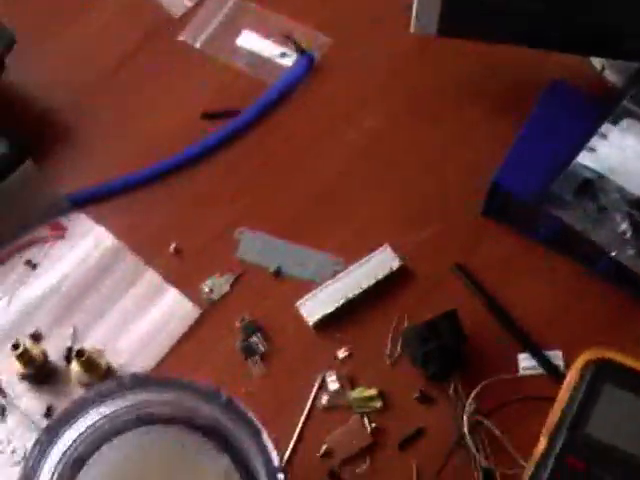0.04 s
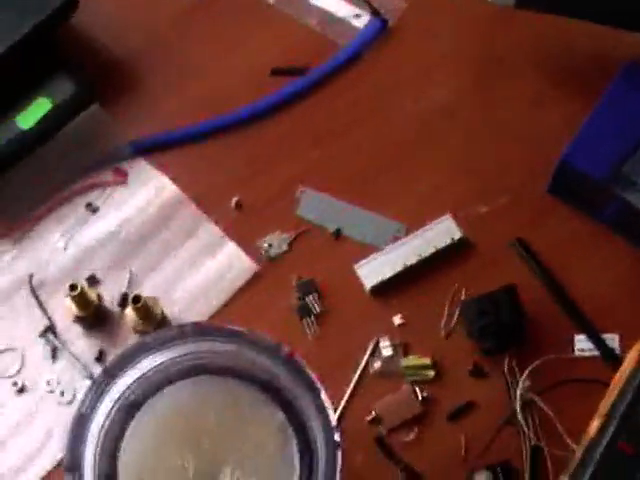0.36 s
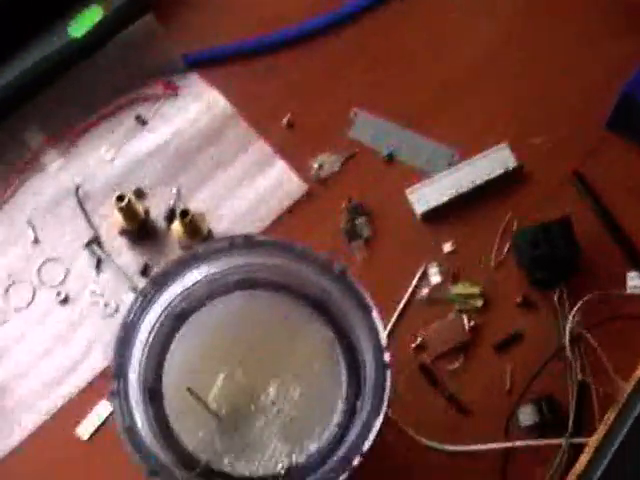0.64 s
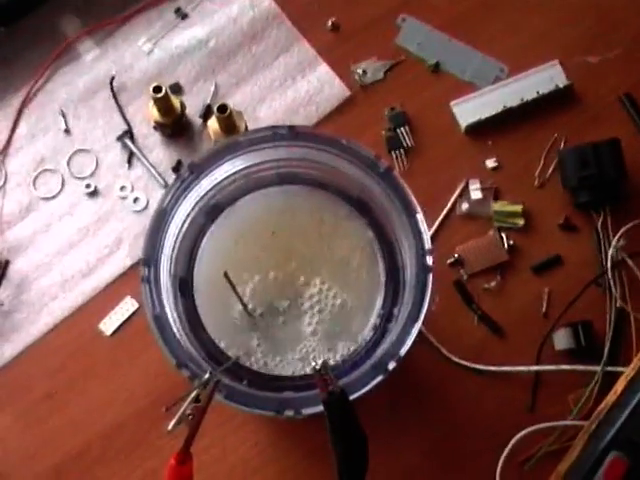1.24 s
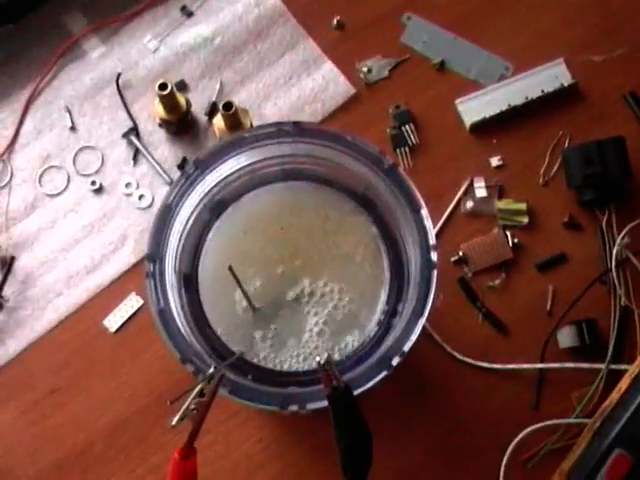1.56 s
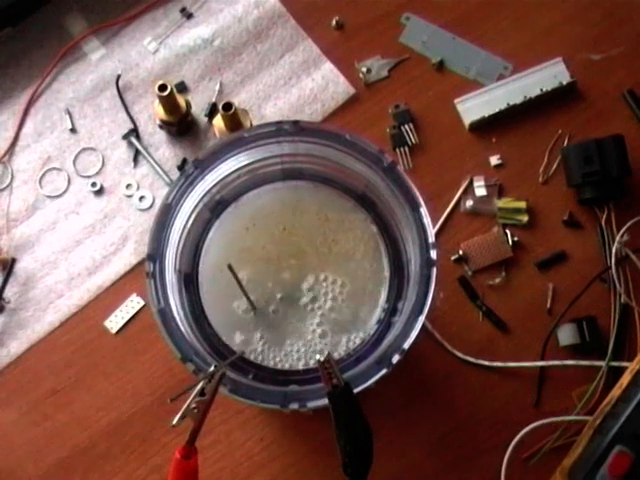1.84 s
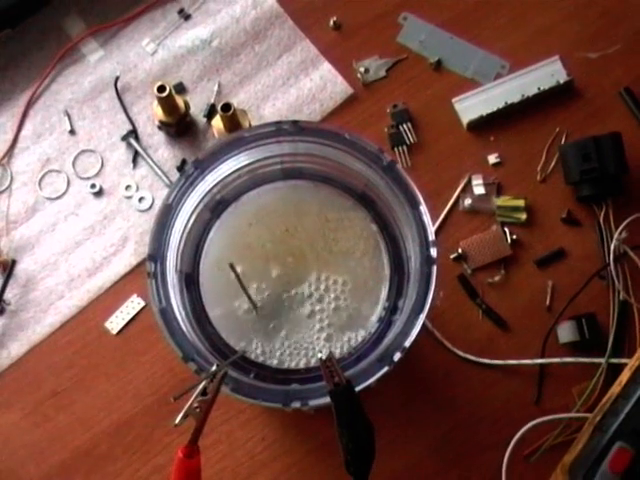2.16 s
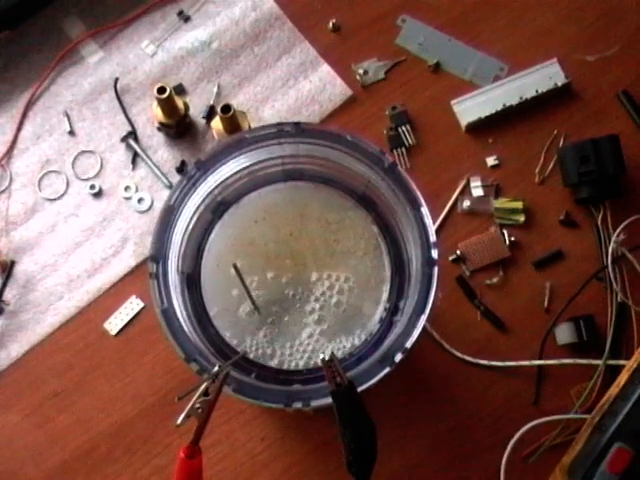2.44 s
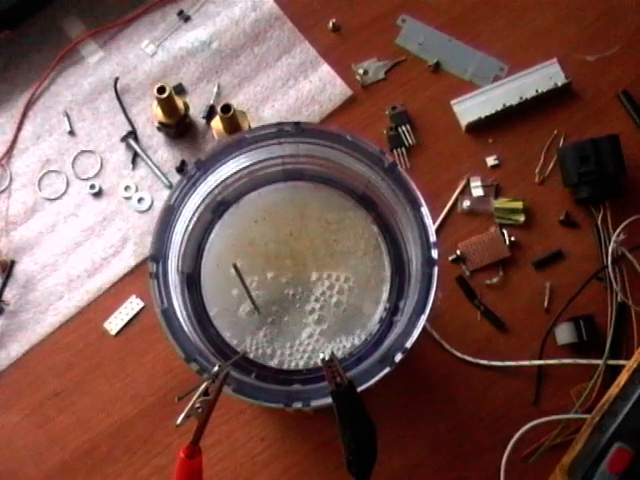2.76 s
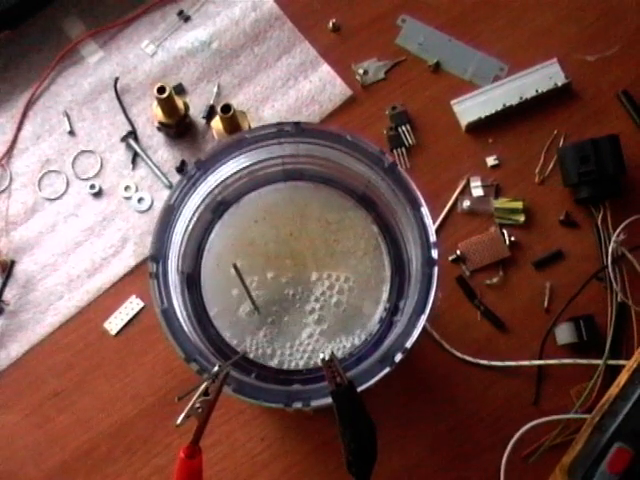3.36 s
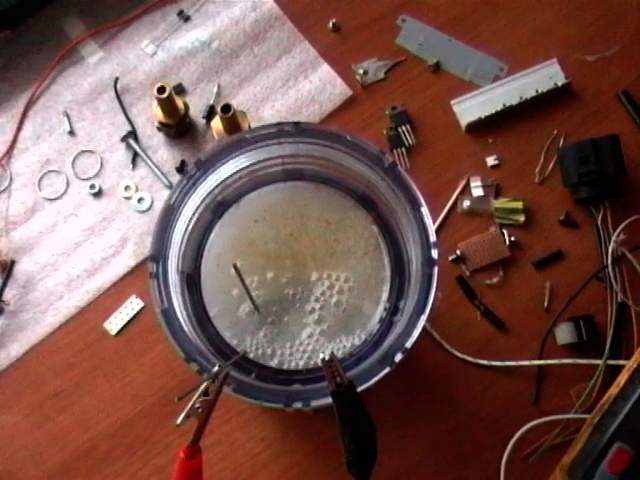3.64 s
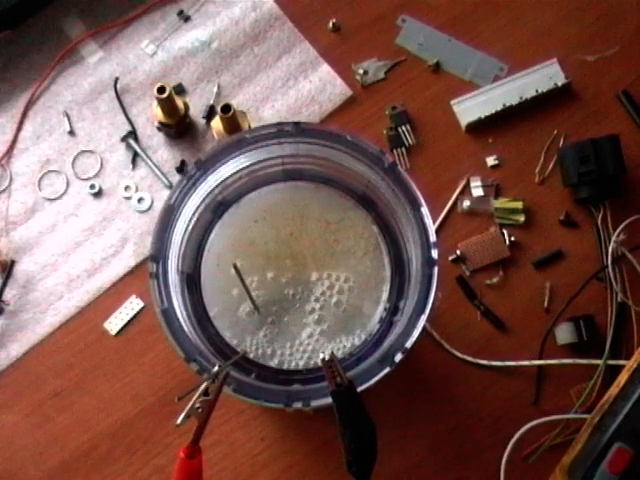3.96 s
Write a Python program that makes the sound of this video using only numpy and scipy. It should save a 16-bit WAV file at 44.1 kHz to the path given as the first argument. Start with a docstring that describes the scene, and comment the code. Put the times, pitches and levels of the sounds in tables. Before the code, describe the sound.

Steady fizzing of tiny bubbles over a faint motor whine, with one dull knock.

```python
"""On a workbench, an electrolysis cell fizzes over a small motor's whine and mains hum.
Thousands of tiny gas bubbles burst, each a damped oscillator, and excite the cell's resonances.
A far clatter reverberates and dies away; close by, two light taps and a dull knock
excite the modes of a damped body. A comb of narrow notches makes everything slightly hollow,
faint whistles sound throughout, and at last all is cut dead with a soft thump."""
import sys
import numpy as np
from scipy import signal
from scipy.fft import rfft, irfft
from scipy.io import wavfile

SR = 44100
rng = np.random.default_rng(int(sys.argv[2]) if len(sys.argv) > 2 else 0)


def put_to_file(sound):
    """Save the sound as 16-bit audio at rate SR, in the file named by the first command-line argument."""
    columns = np.atleast_2d(sound).T  # one column per channel
    safe = np.clip(columns, -1, 1)
    whole_steps = np.round(safe * 32767)
    wavfile.write(sys.argv[1], SR, whole_steps.astype(np.int16))


N = 176400
TIME = np.arange(N) / SR
FREQS = np.maximum(np.arange(N // 2 + 1) * SR / N, 1)
SIDES = np.array([[1], [-1]])  # left, right
ROTOR_HZ, MAINS_HZ, DRONE_HZ = 28.98, 49.83, 226.2
CLATTER_S, STOP_S = .334, 2.525

# Vigour of the fizzing: t/s, gain/dB
FIZZ_VIGOUR = [(0, -0.05), (.25, 0.59), (.6, -0.42), (.9, -0.5), (1.4, -0.78), (2.0, -1.54), (2.5, 0.59)]
# Colour of the fizz: f/Hz, gain/dB
FIZZ_SPECTRUM = [(1500, -12.5), (1800, -6.5), (2200, -3), (2700, -6), (3300, -5.5), (4000, -4), (4600, 0),
                 (5350, -1.5), (6300, -1.5), (7200, -0.7), (8800, -1), (10000, -6), (13300, -14)]
# Resonances of the cell: f/Hz, relative level/dB, t60/s
CELL_MODES = [(3583, -5.5, 0.09), (4565, -4, .045), (4986, -4.5, 0.05), (5878, -4.5, 0.031),
              (5894, -3, 0.048), (7440, -7.5, .03), (7410, -5.5, .04), (7884, -3.5, 0.033),
              (8580, -4.5, 0.035), (9043, -6.5, 0.051)]
# Motor whine: rotor multiple (rounded for the pitch), base level/dB, left-right/dB
WHINE_PARTIALS = [(15.497, -51, -3.5), (16.27, -44.5, -6), (17, -64, -12.5), (18, -69, -5), (18.57, -67, 2),
                  (20, -60, -7), (23, -75, -4.5), (30, -66.5, 12), (32, -65, 2.5), (33, -67, -3.5),
                  (40, -65, 10.5), (49.4, -71, -1)]
# Swell of the whine: t/s, gain/dB
WHINE_ENVELOPE = [(0, 0), (.09, 3), (.27, -2.5), (.42, 0), (.63, -3), (.75, 3.5), (.9, -0.5), (1.28, -0.5),
                  (1.45, 0.5), (1.62, -1.5), (1.74, 2), (1.92, -3.5), (2.1, 1), (2.27, -2), (2.5, -3)]
# Rush of motor and room: f/Hz, gain/dB
RUSH_SPECTRUM = [(20, -4.5), (45, 3.5), (70, 2.5), (115, 6.5), (170, -1), (240, 3.5), (290, -5.5),
                 (400, -2.5), (480, 8.5), (560, 6.5), (620, -2), (665, 2.5), (790, -3), (930, -0.14),
                 (1100, -4), (1420, -2), (1700, -10.5), (4000, -19)]
# Low drone that fades early: t/s, level/dB
DRONE_ENVELOPE = [(0, -63), (.25, -58.5), (.38, -69), (.5, -56), (.62, -65), (.8, -72), (2.5, -70)]
# Thin whistles: f/Hz, level/dB
STEADY_WHISTLES = [(4200, -67.5), (5400, -67), (5761, -69), (6750, -63)]
# Spurts of bubbles: t/s, level/dB
BUBBLE_SPURTS = [(.19, -49.5), (.475, -48), (0.978, -47.5), (1.071, -49.5), (1.60, -50.5), (1.775, -45),
                 (2.055, -47.5), (2.171, -48), (2.30, -51.5), (2.418, -49)]
# Colour of a spurt: f/Hz, gain/dB
SPURT_SPECTRUM = [(3000, -26), (4500, 0), (5100, 0), (5900, -2), (7000, -15.5)]
# Clatter heard through the room: f/Hz, gain/dB
CLATTER_SPECTRUM = [(200, -21), (270, -18), (360, 3), (500, 3.5), (700, 1.5), (1400, -1), (2200, -5.5),
                    (3200, -2.5), (5500, -20.5)]
# Modes of the distant object: f/Hz, initial level/dB, t60/s
CLATTER_MODES = [(331.74, -48.5, 0.8), (392.2, -45, 0.795), (651.7, -49.5, 0.99), (877.5, -46.5, 0.75),
                 (1174, -51, 0.41), (1433, -49, 0.47)]
# Two light taps, then a dull knock with a faint tick just before and after:
# t/s, strength/dB, brightening/(dB per octave)
IMPACTS = [(1.887, -47.5, 4), (2.260, -37.5, 5.5), (2.383, -42, 10), (2.3852, -12.5, -.5),
           (2.391, -37.5, 8)]
# Modes of the struck body: f/Hz, gain/dB, t60/s, left-right/dB
BODY_MODES = [(135, -25, 0.055, -3), (206, -9.5, 0.026, 0), (481.34, -2.5, 0.042, -8),
              (622.7, -12, 0.059, -2.5), (915.7, -10, .024, 2), (1130, -10, 0.022, 1),
              (1770, -13, 0.02, 0.5), (2845, -14.5, 0.02, 4), (4900, -3, .012, 2)]
# Colour of a contact's crack: f/Hz, gain/dB
CRACK_SPECTRUM = [(500, -16), (1000, -2), (2000, -5), (3200, -10), (5000, -18), (7000, -34)]
# Stereo balance: f/Hz, left-right/dB
BALANCE = [(60, -5), (110, -1), (200, -0.5), (360, -4.5), (660, -1.5), (1190, 1.5), (2170, 1), (3950, 3),
           (7190, 4.5), (13100, -0.5)]
# Likeness of the two channels: f/Hz, coherence
COHERENCE = [(60, 0.69), (130, 0.77), (250, 0.19), (500, .7), (1000, 0.19), (2500, 0.71), (6000, 0.84),
             (13000, .55)]
# Lead of the left channel: f/Hz, phase/rad
PHASE_LEAD = [(50, -0.47), (300, -2), (430, 0.8868), (470, 2), (950, 2), (1160, -0.33), (1450, 1.3768),
              (2100, 0.7164), (9000, 0.58)]


def from_db(db):
    """Amplitude grows tenfold every 20 dB."""
    return 10 ** (np.asarray(db) / 20)


def unit_rms(x):
    """Normalisation to unit mean power."""
    return x / np.sqrt(np.mean(x ** 2) + 1e-20)


def in_time(points):
    """Linear interpolation of (t/s, value) points."""
    return np.interp(TIME, *np.transpose(points))


def at_hz(points, hz):
    """Interpolation of (f/Hz, value) points on a log-frequency axis."""
    f, value = np.transpose(points)
    return np.interp(np.log(hz), np.log(f), value)


def panned(db):
    """A level difference, shared between left and right gains."""
    return from_db(SIDES * db / 2)


def drift(rate_hz):
    """Low-passed noise gives a slow random fluctuation of unit rms."""
    step, settle = 40, 2000
    pole = np.exp(-2 * np.pi * rate_hz * step / SR)
    noise = rng.standard_normal(N // step + settle + 2)
    slow = signal.lfilter([1], [1, -2 * pole, pole * pole], noise)[settle:]
    return np.interp(np.arange(N) / step, np.arange(len(slow)), unit_rms(slow))


def ring(clicks, hz, t60):
    """A damped oscillator answers each impulse with a decaying sine."""
    r, w = from_db(-60 / (t60 * SR)), 2 * np.pi * hz / SR
    return signal.lfilter([0, np.sin(w)], [1, -2 * r * np.cos(w), r * r], clicks + 1e-18)


def clicks_at(times, gains):
    """Ideal impulses at the given times."""
    out = np.zeros(N)
    out[(np.asarray(times) * SR).astype(int)] = gains
    return out


def in_stereo(pair, spectrum):
    """Partial coherence: two independent signals, coloured and mixed as mid and side to unit rms."""
    mid, side = rfft(pair) * from_db(at_hz(spectrum, FREQS))
    coherence = at_hz(COHERENCE, FREQS)
    both = np.sqrt(1 + coherence) * mid + SIDES * np.sqrt(1 - coherence) * side
    phase_shift = np.exp(.5j * SIDES * at_hz(PHASE_LEAD, FREQS))
    return unit_rms(irfft(both * panned(at_hz(BALANCE, FREQS)) * phase_shift, N))


def noise_bands(low_hz, count):
    """Band-pass filtering yields half octaves of two-channel noise as (centre/Hz, band)."""
    for k in range(count):
        edges = low_hz * 2 ** (np.array([k, k + 1]) / 2)
        sos = signal.butter(2, np.minimum(edges, SR / 2 - 10), "band", fs=SR, output="sos")
        yield np.sqrt(edges.prod()), signal.sosfilt(sos, rng.standard_normal((2, N)))


def tone(hz, db):
    """A sine of given rms level; phase is the integral of frequency."""
    return np.sqrt(2) * from_db(db) * np.sin(2 * np.pi * np.cumsum(hz * np.ones(N)) / SR)


def bubble_hiss(level_db=-49, flicker_db=1.0):
    """Incoherent addition: the finest bubbles merge into a hiss whose bands flicker a little."""
    bands = sum(band * from_db(flicker_db * drift(10)) for _, band in noise_bands(1000, count=8))
    return from_db(level_db) * in_stereo(bands, FIZZ_SPECTRUM)


def bubble_bursts(level_db=-49, base_per_s=2100, clump_db=4, spread_db=3, t60_cycles=10, pitches=28):
    """Damped oscillation: bubbles burst in loose clumps, each ringing briefly at its own pitch."""
    out = np.zeros((2, N))
    for hz in np.geomspace(2200, 12500, pitches):
        bursts = rng.random((2, N)) < base_per_s / pitches * from_db(clump_db * drift(16)) / SR
        sizes = from_db(spread_db * np.minimum(rng.exponential(1, (2, N)), 5))
        signs = np.sign(rng.random((2, N)) - .5)
        treble_tilt = hz * from_db(-2.5 * np.log2(hz))
        out += treble_tilt * ring(bursts * sizes * signs, hz, t60_cycles / hz)
    return from_db(level_db) * in_stereo(out, FIZZ_SPECTRUM)


def cell_ring(level_db=-55, strikes_per_s=220, spread_db=7.5):
    """Random excitation: bubbles bursting at the wall keep the cell's modes ringing."""
    out = 0
    for hz, db, t60 in CELL_MODES:
        strikes = (rng.random(N) < strikes_per_s / SR) * from_db(spread_db * rng.standard_normal(N))
        out += from_db(db) * unit_rms(ring(strikes, hz, t60)) * panned(at_hz(BALANCE, hz))
    return from_db(level_db) * unit_rms(out)


def motor(rush_db=-49, speed_wander=.0016):
    """Periodic rotation sounds harmonics of a slightly wandering rotor speed, over a soft rush."""
    turns = np.cumsum(ROTOR_HZ * (1 + speed_wander * drift(3.2))) / SR
    swell_db = in_time(WHINE_ENVELOPE)
    out = from_db(rush_db) * in_stereo(rng.standard_normal((2, N)), RUSH_SPECTRUM)
    for multiple, db, pan_db in WHINE_PARTIALS:
        unsteadiness = multiple / 20  # higher partials waver more
        phase = 2 * np.pi * round(multiple) * turns + unsteadiness * .1 * drift(12)
        lead = SIDES / 2 * at_hz(PHASE_LEAD, multiple * ROTOR_HZ)
        waver_db = unsteadiness * (1.1539 * drift(5) + .43 * drift(28))
        out += np.sqrt(2) * from_db(db + swell_db + waver_db) * panned(pan_db) * np.sin(phase + lead)
    return out


def hum(mains_db=-55, wander_hz=4, waver_db=3):
    """Superposition of steady mains hum and a low drone modulated in pitch and level."""
    drone = tone(DRONE_HZ + wander_hz * drift(12), in_time(DRONE_ENVELOPE) + waver_db * drift(13))
    return tone(MAINS_HZ, mains_db) + drone


def bubble_spurts(bursts_per_s=3000, width_s=.014):
    """Shot noise in Gaussian swells: now and then a raft of bubbles bursts at once."""
    envelope = sum(from_db(db) * np.exp(-.5 * ((TIME - s) / width_s) ** 2) for s, db in BUBBLE_SPURTS)
    clicks = (rng.random((2, N)) < bursts_per_s / SR) * rng.standard_normal((2, N))
    return envelope * in_stereo(clicks, SPURT_SPECTRUM)


def far_clatter(level_db=-40, rise_s=.011, lag_s_per_octave=.0094, width=.6344):
    """Reverberation blurs a blow across the room; the lows arrive later and last longer."""
    out, power = 0, 0
    for hz, band in noise_bands(191, count=10):
        age = np.maximum(TIME - CLATTER_S + lag_s_per_octave * np.log2(hz / 1000), 0)
        t60 = .89 * (1000 / hz) ** .086
        envelope = np.minimum(age / rise_s, 1) * from_db(-60 * np.maximum(age - rise_s, 0) / t60)
        mid, side = band * from_db(at_hz(CLATTER_SPECTRUM, hz))
        out += envelope * (mid + width * side * SIDES)
        power += mid.var() + width ** 2 * side.var()
    return from_db(level_db) * out / np.sqrt(power)


def clatter_ring(delay_s=.02):
    """Free vibration: the distant object rings on in its modes."""
    return sum(ring(clicks_at(CLATTER_S + delay_s, from_db(db)), hz, t60)
               for hz, db, t60 in CLATTER_MODES)


def knocks(pivot_hz=450, contact_hz=1350, lowest_hz=80):
    """Impacts excite one heavily damped body; the soft contact acts as a low-pass filter."""
    times, strength_db, brightening = np.transpose(IMPACTS)
    out = 0
    for hz, mode_db, t60, pan_db in BODY_MODES:
        gains = from_db(strength_db + mode_db + brightening * np.log2(hz / pivot_hz))
        out += panned(pan_db) * ring(clicks_at(times, -gains), hz, t60)
    softened = signal.sosfilt(signal.butter(2, contact_hz, fs=SR, output="sos"), out)
    return signal.sosfilt(signal.butter(2, lowest_hz, "high", fs=SR, output="sos"), softened)


def contact_cracks(relative_db=-20.5, decay_s=.0063):
    """A brief transient is broadband: each contact gives a few milliseconds of noise."""
    envelope = sum(from_db(db + relative_db) * (TIME >= s) * np.exp(-np.maximum(TIME - s, 0) / decay_s)
                   for s, db, _ in IMPACTS)
    return envelope * in_stereo(rng.standard_normal((2, N)), CRACK_SPECTRUM)


def scene():
    """Linear superposition of the fizzing cell, motor, hum, clatter and knocks."""
    vigour = from_db(in_time(FIZZ_VIGOUR))
    fizz = vigour * (bubble_hiss() + bubble_bursts() + cell_ring()) + bubble_spurts()
    return fizz + motor() + hum() + far_clatter() + clatter_ring() + knocks() + contact_cracks()


def record(dry):
    """A comb of narrow notches hollows the sound; faint whistles, a sudden stop and a steep top cut follow."""
    spacing_hz, feedback, depth = 149.8, .6426, .93
    fade_s, thump_db, thump_decay_s, cutoff_hz = .0016, -40, .817, 13450
    delay = np.exp(-2j * np.pi * FREQS / spacing_hz)
    comb = 1 - depth * (1 - feedback) * delay / (1 - feedback * delay)
    sound = irfft(rfft(dry) * comb, N) + sum(tone(hz, db) for hz, db in STEADY_WHISTLES)
    since_stop = np.maximum(TIME - STOP_S, 0)
    gate = np.exp(-since_stop / fade_s)
    thump = (1 - gate) * from_db(thump_db) * np.exp(-since_stop / thump_decay_s)  # a relaxing step
    top_cut = signal.ellip(12, .1, 90, cutoff_hz, fs=SR, output="sos")
    return signal.sosfilt(top_cut, sound * gate + thump)


dry = scene()
out = record(dry)
put_to_file(out)
```